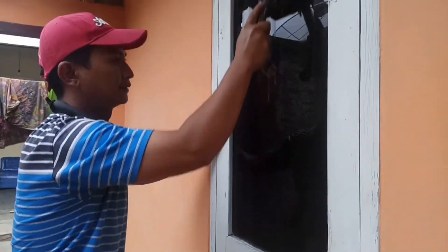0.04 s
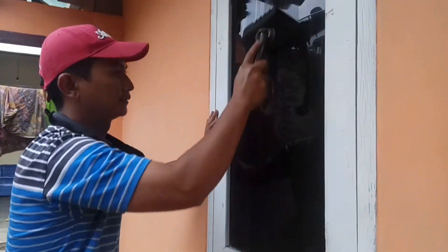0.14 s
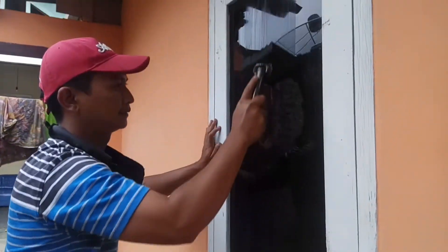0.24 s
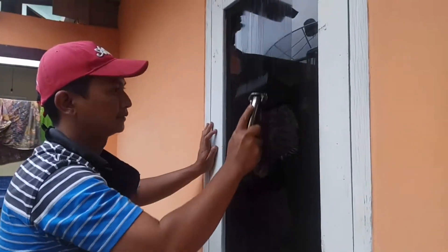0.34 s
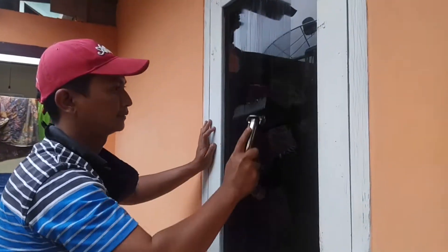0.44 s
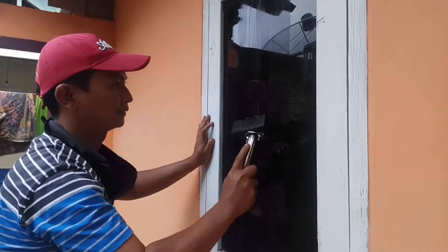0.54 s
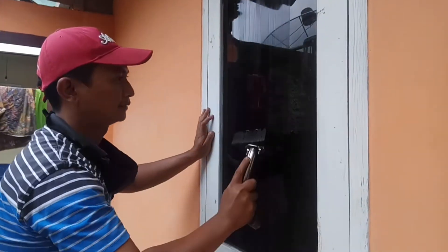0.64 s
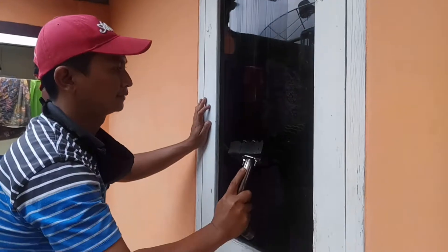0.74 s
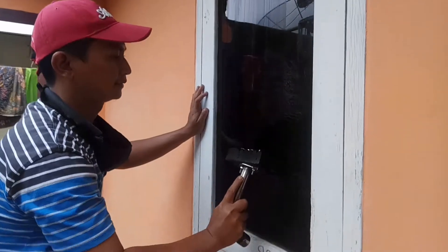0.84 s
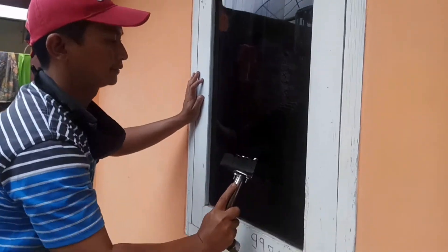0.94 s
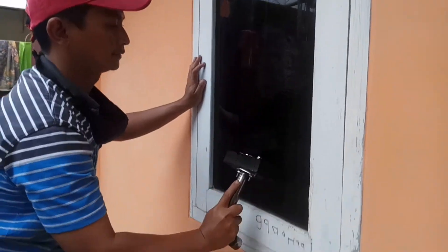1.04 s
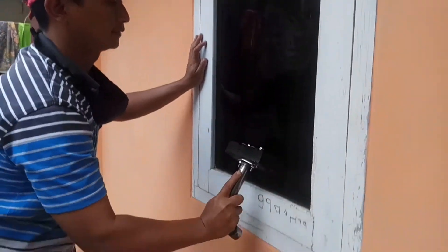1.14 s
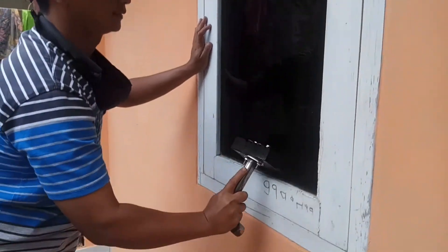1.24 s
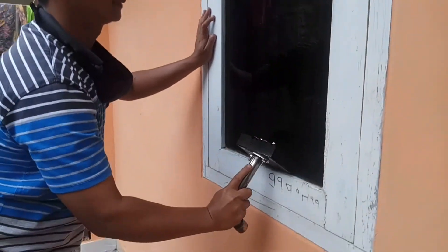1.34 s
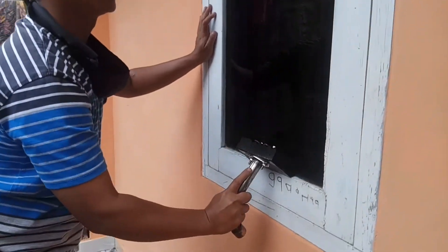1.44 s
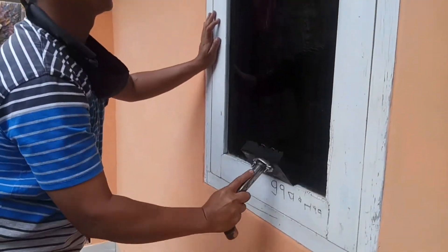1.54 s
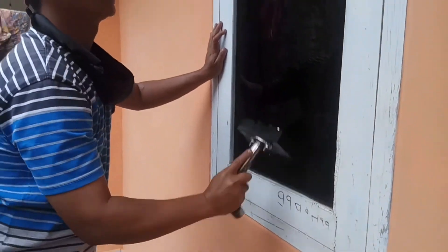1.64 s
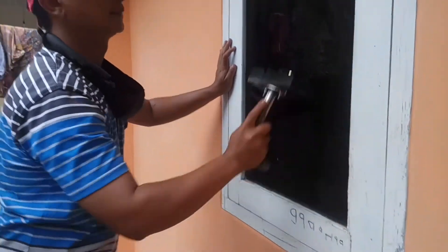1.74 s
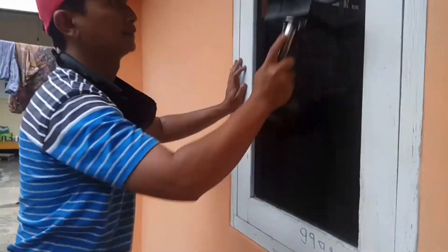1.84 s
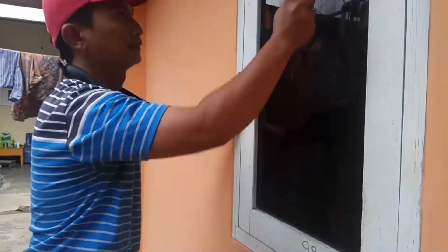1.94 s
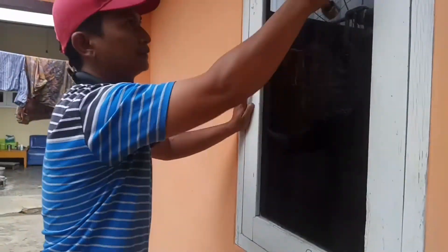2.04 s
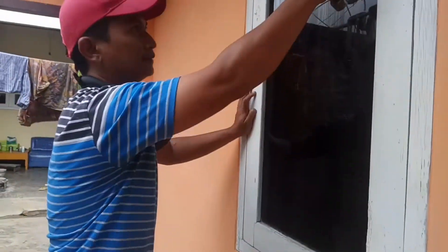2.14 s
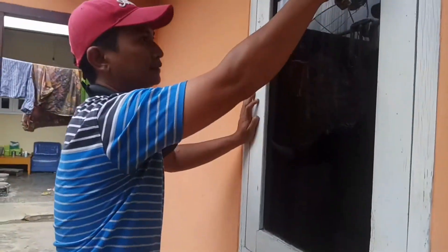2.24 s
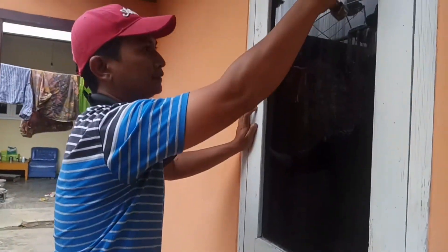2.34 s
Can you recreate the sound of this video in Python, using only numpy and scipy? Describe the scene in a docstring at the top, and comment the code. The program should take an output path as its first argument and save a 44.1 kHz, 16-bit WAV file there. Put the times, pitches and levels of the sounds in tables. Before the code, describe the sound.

Close outdoor stereo: low rumble and rubber hiss, then a strong wavering wiper squeal on a window pane, a dull scuff at the bottom, a quiet gap, and brief rubbing with faint chirps and right-side wind puffs.

```python
"""A low rumble and the hiss of a rubber blade come first, then the blade squeals down a window pane.
The lip sticks and slips on one nearly pure note with overtones; soft booms of the pane lie beneath it.
The blade scuffs the bottom of the frame, is lifted, and lands to rub again at the top.
Rubbing is shaped noise in three bands. Late puffs of air thump the right microphone as pressure pulses,
and the lip chirps faintly; the thin sizzle of the background leans far to the right microphone."""
import sys
import numpy as np
from scipy import signal
from scipy.fft import rfft, irfft
from scipy.io import wavfile
from scipy.ndimage import uniform_filter1d

SR = 44100
rng = np.random.default_rng(int(sys.argv[2]) if len(sys.argv) > 2 else 0)


def store_pcm(level_fs):
    """Save levels as 16-bit WAV."""
    pcm = np.round(np.clip(level_fs, -1, 1) * 32767).astype(np.int16)
    wavfile.write(sys.argv[1], SR, np.atleast_2d(pcm).T)


N = 105840
T = np.arange(N) / SR  # time of every sample, s

# All noise colours are relative: each noise is scaled to rms 1 before its level is set.
# likeness of left and right microphone in every noise [f/Hz, correlation]
LIKENESS = [(50, 0.98), (130, 0.93), (300, 0.77), (1000, 0.5), (2500, 0.085), (5000, 0), (15000, 0.045)]
PATCH_DB, FLICKER_DB = 1, 1.7  # rms grain of noise at grain 1: patches in time and pitch, frame flicker

# colour of the low background [f/Hz, level per Hz/dB]
RUMBLE_COLOUR = [(20, -15), (42, -24), (60, -1.5), (72, -4), (87, 2), (120, -1.5), (160, -9), (240, -16),
                 (400, -19.5), (600, -36), (1000, -45.5), (2000, -47), (4000, -48.5), (8000, -58),
                 (15000, -47.5)]
# rise and fall of the rumble [t/s, level/dB]
RUMBLE_LEVEL = [(0, -33), (.13, -39), (.27, -40), (.6, -41.5), (1.1, -43.5), (1.36, -39.5), (1.54, -35),
                (1.8, -40.5), (2.4, -40)]
# colour of the faint high sizzle [f/Hz, level per Hz/dB]
SIZZLE_COLOUR = [(3000, -28.5), (5300, -20.5), (6200, 7.5), (6800, 2.5), (7800, -24), (10800, -18),
                 (12500, -28.5), (15000, -9.5)]
SIZZLE_DB, SIZZLE_LEFT_DB = -60, -19  # sizzle before the left microphone is turned down

# friction of the sliding blade [t/s, hiss level/dB, coarser scrape level/dB, highest fizz level/dB]
RUB_LEVELS = [(0, -44, -46, -46.5), (.19, -42.5, -48.5, -47.5), (.35, -48, -49.5, -52),
              (.44, -47.5, -46, -52.5), (.62, -48, -47, -54.5), (.82, -46.5, -53.5, -52.5),
              (.93, -39, -50.5, -46.5), (1.03, -45.5, -51, -51), (1.17, -49, -52.5, -53),
              (1.3, -43, -40, -45.5), (1.42, -60.5, -52, -62), (1.6, -62.5, -57.5, -71),
              (1.77, -68, -68, -75.5), (1.95, -87, -77, -78), (2.02, -72.5, -61, -61.5),
              (2.135, -64.5, -64.5, -60.5), (2.18, -48, -56.5, -46), (2.24, -47, -54, -47),
              (2.33, -57.5, -56.5, -54), (2.4, -56, -53.5, -53)]
# colour of the hiss [f/Hz, level per Hz/dB]
HISS_COLOUR = [(800, -22), (2750, -24.5), (3450, -8), (4200, -2), (5500, 3.5), (6500, 0), (7800, -15.5),
               (10000, -28), (16000, -34)]
# place of the hiss [f/Hz, left minus right/dB]
HISS_PLACE = [(1000, 5), (3500, -2), (5000, -2.5), (6500, -3.5), (7600, 6), (9000, 8)]
# colour of the coarser scrape [f/Hz, level per Hz/dB]
SCRAPE_COLOUR = [(100, -1), (350, 7.5), (600, 1.5), (950, 3), (1300, -1), (2000, 0), (2700, -5.5),
                 (4000, -3), (7000, -27), (15000, -31.5)]
# colour of the highest fizz [f/Hz, level per Hz/dB]
FIZZ_COLOUR = [(5000, -21.5), (7800, -8.5), (10300, -0.5), (12000, -6.5), (13700, -7), (15000, -0.5),
               (16000, -1)]
# place of the fizz [f/Hz, left minus right/dB]
FIZZ_PLACE = [(7600, 3), (9000, 14), (11000, 16), (13000, 11), (15500, 13)]
# blade scuffs the frame or lands on the glass
# [t/s, rise/s, decay/s, hiss level/dB, scrape level/dB, fizz level/dB, frame knock level/dB]
SCUFF_EVENTS = [(1.504, 0.032, 0.016, -48.5, -57, -51, -37.5), (1.527, 0.026, 0.016, -57, -44, -60, -34),
                (1.569, 0.034, 0.056, -91, -84.5, -77, -35), (2.057, .003, 0.016, -62, -80.5, -45, -67),
                (2.085, 0.026, 0.023, -53, -67, -67.5, -62), (2.112, 0.001, 0.0027, -69, -51.5, -66, -61),
                (2.266, .008, 0.013, -72, -52.5, -55, -51), (2.398, 0.0086, .03, -66, -51, -54, -49)]
# colour of the frame's knock, also of the air turbulence [f/Hz, level per Hz/dB]
KNOCK_COLOUR = [(40, -19.5), (80, 6.5), (150, 2.5), (260, -1), (420, -5.5), (700, -19), (1200, -28),
                (4000, -70.5)]

# stick-slip rate of the blade [t/s, f/Hz]
STICK_SLIP = [(0, 769), (.15, 774), (.22, 763.8), (.35, 758.6), (.39, 768), (.43, 761.6), (.52, 754.7),
              (.63, 750.7), (.8, 759.5), (.86, 761), (.9, 765.7), (.93, 763.5), (.97, 762.5), (1.08, 767.3),
              (1.18, 759.2), (1.3, 770.3), (1.42, 774)]
# strength of the squeal's fundamental [t/s, level/dB]
SQUEAL_LEVEL = [(0, -49.5), (.155, -51), (.215, -15.5), (.235, -13), (.27, -14), (.34, -10), (.385, -15),
                (.44, -11.5), (.53, -11), (.59, -14), (.64, -13), (.68, -10), (.745, -8), (.8, -11),
                (.845, -12), (.925, -23.5), (.96, -13.5), (1.01, -12), (1.13, -14), (1.18, -18),
                (1.28, -18.5), (1.305, -25.5), (1.34, -50), (1.38, -41.5), (1.425, -60), (1.46, -100)]
# place of the fundamental [t/s, left minus right/dB, left lead/rad]
SQUEAL_PLACE = [(.2, 0.5, -0.44), (.42, 0.4, 0.2), (.58, -6.5, 0.36), (.66, -2.5, -0.7), (.76, 2, -0.35),
                (.9, -2.5, -.9), (.96, -1, -0.048), (1.15, -6, -.2), (1.26, -5, 0.32), (1.31, 2.5, 0.99)]
# overtones, strong where the rubber grips hardest
# [t/s, octave level/dB, twelfth level/dB, fifth harmonic level/dB, reference for the others/dB]
GRIP_OVERTONES = [(.183, -58, -80.5, -80, -84.5), (.21, -35.5, -64, -54, -50),
                  (.27, -37, -59.5, -61.5, -56.5), (.39, -39, -56.5, -59.5, -55),
                  (.45, -32.5, -50.5, -56.5, -51.5), (.5, -30.5, -42.5, -55, -49),
                  (.555, -30.5, -33.5, -38.5, -38.5), (.61, -35, -41.5, -53.5, -43),
                  (.67, -28.5, -46, -54, -42), (.75, -34, -36.5, -42.5, -38.5), (.815, -51, -40, -41, -47),
                  (.85, -47.5, -30.5, -52, -34.5), (.91, -30.5, -38, -33, -47),
                  (.96, -38, -28.5, -46, -37.5), (1.05, -36, -54.5, -44, -53),
                  (1.12, -41.5, -46, -58, -56.5), (1.255, -43.5, -60, -70, -66.5),
                  (1.31, -56.5, -58.5, -73.5, -75.5)]
# the other overtones [multiple of the pitch, level above the reference/dB]
OTHER_OVERTONES = [(4, -7), (6, -5), (7, -3), (8, -9.5), (9, -20.5), (10, -25.5)]
BRIGHT_SIDE_DB = -2.5  # left minus right, for the fifth harmonic and the other overtones
JITTER, JITTER_HZ = 0.00089, 56.7  # rms pitch unsteadiness as a share, and how fast
SHIMMER_DB, SHIMMER_HZ = 0.51, 61.5  # rms level unsteadiness, and how fast
FADING, FADING_HZ = 0.42, 12  # share of reflected sound in the other overtones; rate of all reflections
LOW_FADING = .15  # share of reflected sound in the strongest overtones and the chirps
LOW_WANDER, LOW_WANDER_HZ = 0.65, 4  # rms phase wander of the strongest overtones (rad), and how fast
FLUTTER_DB, FLUTTER_HZ = -52.5, 28.4  # ringing of the lip under friction, and how fast it varies
STROKE_END_S, RELEASE_S = 1.393, 0.031  # the ringing then dies away exponentially
# two moments when the note's level is roughened [t/s]
ROUGH_TIMES = [.475, .7]
ROUGH_DB, ROUGH_HZ, ROUGH_WIDTH_S = 0.21, 278, 0.041  # rms at its height, how fast, rise and decay

# pane booms softly as the blade catches or reaches the frame [t/s, f/Hz, level/dB]
PANE_THUDS = [(.205, 102.8, -31.5), (1.433, 79.5, -29)]
THUD_RISE_S, THUD_DECAY_S = 0.011, 0.023

# blade rasps briefly as it lands and starts to slide [t/s, level/dB]
RASP_EVENTS = [(2.082, -59), (2.258, -51.5)]
# colour of the rasp [f/Hz, level per Hz/dB]
RASP_COLOUR = [(1700, -36), (2800, 0), (4300, -32.5)]

# puffs of air on the right microphone [t/s, half width to 1/e of the Gaussian/s, peak level/dB]
AIR_PUFFS = [(2.1466, 0.0014, -17.5), (2.1645, .0028, -8.5), (2.339, 0.0033, -21.5)]
BUFFET_DB, BUFFET_S = -26, 0.023  # turbulence relative to its puff, and its rise and decay

# lip rings faintly as the next stroke begins [t/s, f/Hz, level/dB]
LIP_CHIRPS = [(2.245, 1455, -55.5), (2.287, 1343, -60.5)]
CHIRP_RISE_S, CHIRP_DECAY_S = 0.019, 0.047  # also of the rasps
CHIRP_JITTER = 0.0071  # rms pitch unsteadiness as a share

LEFT_RIGHT = np.array([[.5], [-.5]])  # splits a left-minus-right value between the microphones
EDGE_HZ = 15700  # upper band limit


def amp(db):
    """Decibels to gain."""
    return 10 ** (np.asarray(db) / 20)


def unit(x):
    """Scales to rms 1."""
    return x / np.sqrt(np.mean(abs(x) ** 2) + 1e-20)


def curve(table, axis=1):
    """One column of a time table at every sample."""
    rows = np.array(table)
    return np.interp(T, rows[:, 0], rows[:, axis])


def read(points, hz):
    """A spectrum on a log-frequency axis."""
    f, value = np.transpose(points)
    return np.interp(np.log(hz + 1), np.log(f), value)


def drift(rate_hz):
    """Smooth random motion of rms 1, up to about the given rate."""
    rolloff = 1 + (np.fft.rfftfreq(N, 1 / SR) / rate_hz) ** 4
    return unit(irfft(rfft(rng.standard_normal(N)) / rolloff, N))


def complex_drift(rate_hz):
    """Random motion of strength and phase together, rms 1."""
    return unit(drift(rate_hz) + 1j * drift(rate_hz))


def noise(spectrum, side=None, grain=0, size=1024):
    """Stereo noise of a given colour at rms 1; grain adds patches and flicker."""
    hop = size // 4
    hz, frames = np.fft.rfftfreq(size, 1 / SR), N // hop + 5
    a, b, c, d, patch = rng.standard_normal((5, frames, len(hz)))
    shared, separate = a + 1j * b, c + 1j * d
    same = np.clip(read(LIKENESS, hz), -1, 1)
    z = np.array([shared, same * shared + np.sqrt(1 - same ** 2) * separate])
    patch = uniform_filter1d(patch, size=14, axis=0)
    patch = unit(uniform_filter1d(patch, size=7, axis=1))
    flicker = rng.standard_normal((frames, 1))
    z = z * amp(read(spectrum, hz) + grain * (PATCH_DB * patch + FLICKER_DB * flicker))
    if side:
        lean = amp(LEFT_RIGHT[:, :, None] * read(side, hz))
        z = z * lean / np.sqrt((lean ** 2).mean(0))
    sound = signal.istft(z.transpose(0, 2, 1), nperseg=size, noverlap=size - hop)[1]
    return unit(sound[:, :N])


def burst(at, rise, decay):
    """A Gaussian swell to the given moment, then an exponential fall."""
    return np.exp(-(np.minimum(T - at, 0) / rise) ** 2 - np.maximum(T - at, 0) / decay)


def reflected(share, wander=0):
    """Direct sound plus reflections whose strength and phase drift at each microphone."""
    paths = [unit(1 - share + share * complex_drift(FADING_HZ)) for microphone in "LR"]
    return np.array([path * np.exp(1j * wander * drift(LOW_WANDER_HZ)) for path in paths])


def unsteady_phase(hz, jitter):
    """Running phase of a note whose pitch trembles as the rubber slips."""
    return 2 * np.pi * np.cumsum(hz * (1 + jitter * drift(JITTER_HZ))) / SR


def background():
    """Low rumble as shaped noise, and a thin sizzle leaning to the right microphone."""
    sizzle = noise(SIZZLE_COLOUR, grain=0.93, size=512) * amp(SIZZLE_DB) * amp([[SIZZLE_LEFT_DB], [0]])
    return amp(curve(RUMBLE_LEVEL)) * noise(RUMBLE_COLOUR, size=4096) + sizzle


def rubbing():
    """Friction noise of the sliding blade in three bands, with scuffs that also knock the wooden frame."""
    hiss, scrape, fizz = [amp(curve(RUB_LEVELS, axis)) for axis in (1, 2, 3)]
    levels = np.array([hiss, scrape, fizz, np.zeros(N)])  # the knock sounds only in scuffs
    for at, rise, decay, *levels_db in SCUFF_EVENTS:
        levels += amp(levels_db)[:, None] * burst(at, rise, decay)
    layers = [
        noise(HISS_COLOUR, HISS_PLACE, grain=0.99, size=512),
        noise(SCRAPE_COLOUR, grain=1.0, size=512),
        noise(FIZZ_COLOUR, FIZZ_PLACE, grain=1.0, size=512),
        noise(KNOCK_COLOUR),
    ]
    return sum(level * layer for level, layer in zip(levels, layers))


def squeal():
    """The rubber lip sticks and slips: a strong fundamental with overtones that follow its grip."""
    phase = unsteady_phase(curve(STICK_SLIP), JITTER)
    place = amp(LEFT_RIGHT * curve(SQUEAL_PLACE)) * np.exp(1j * LEFT_RIGHT * curve(SQUEAL_PLACE, axis=2))
    release = np.exp(-np.maximum(T - STROKE_END_S, 0) / RELEASE_S)
    flutter = amp(FLUTTER_DB) * complex_drift(FLUTTER_HZ) * release
    tone = (amp(curve(SQUEAL_LEVEL)) + flutter) * place * np.exp(1j * phase)

    sounding = (T > GRIP_OVERTONES[0][0]) & (T < GRIP_OVERTONES[-1][0])
    bright_place = sounding * amp(LEFT_RIGHT * BRIGHT_SIDE_DB)
    for axis, multiple, where in [(1, 2, sounding), (2, 3, sounding), (3, 5, bright_place)]:
        path = reflected(LOW_FADING, LOW_WANDER)
        tone += where * amp(curve(GRIP_OVERTONES, axis)) * path * np.exp(1j * multiple * phase)
    bright = bright_place * amp(curve(GRIP_OVERTONES, axis=4))
    for multiple, db in OTHER_OVERTONES:
        tone += bright * amp(db) * reflected(FADING) * np.exp(1j * round(multiple) * phase)

    near_rough = sum(burst(at, ROUGH_WIDTH_S, ROUGH_WIDTH_S) for at in ROUGH_TIMES)
    roughness = drift(ROUGH_HZ) * near_rough
    unsteady_level = amp(SHIMMER_DB * drift(SHIMMER_HZ) + ROUGH_DB * roughness)
    return np.sqrt(2) * tone.real * unsteady_level


def thuds():
    """The lowest resonance of the pane swells and dies under each push."""
    out = np.zeros(N)
    for at, hz, db in PANE_THUDS:
        swell = burst(at, THUD_RISE_S, THUD_DECAY_S)
        out += np.sqrt(2) * amp(db) * swell * np.sin(2 * np.pi * hz * (T - at))
    return out


def rasps():
    """A narrow band of friction noise from the edge of the blade."""
    level = sum(amp(db) * burst(at, CHIRP_RISE_S, CHIRP_DECAY_S) for at, db in RASP_EVENTS)
    return noise(RASP_COLOUR, grain=1, size=512) * level


def puffs():
    """Each eddy is one dip of pressure with a little turbulence around it."""
    right, turbulence = np.zeros(N), noise(KNOCK_COLOUR)[1]
    for at, width, db in AIR_PUFFS:
        u = (T - at) / width
        dip = (2 * u ** 2 - 1) * np.exp(-u ** 2)
        buffet = amp(BUFFET_DB) * turbulence * burst(at, BUFFET_S, BUFFET_S)
        right += amp(db) * (dip + buffet)
    return np.array([np.zeros(N), right])


def chirps():
    """Short unsteady notes of the rubber that never build up to a squeal."""
    out = np.zeros((2, N))
    for at, hz, db in LIP_CHIRPS:
        note = (reflected(LOW_FADING) * np.exp(1j * unsteady_phase(hz, CHIRP_JITTER))).real
        out += np.sqrt(2) * amp(db) * burst(at, CHIRP_RISE_S, CHIRP_DECAY_S) * note
    return out


def scene():
    """Background, wiper, pane and air together at the two microphones."""
    return background() + rubbing() + squeal() + thuds() + rasps() + puffs() + chirps()


def record(dry):
    """A steep upper band limit on both microphones."""
    lowpass = signal.firwin(511, EDGE_HZ, window=("kaiser", 9), fs=SR)
    return signal.oaconvolve(dry, lowpass[None], "same")


dry = scene()
out = record(dry)
store_pcm(out)
```